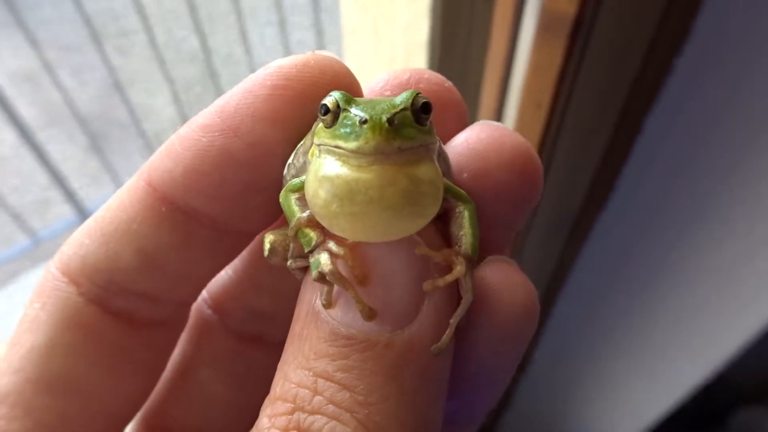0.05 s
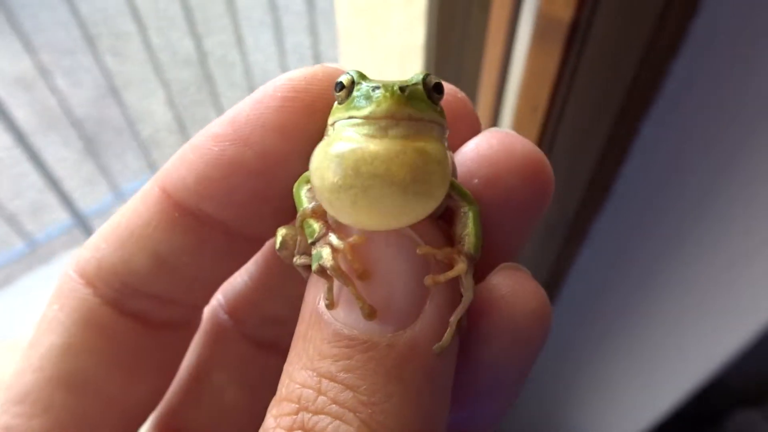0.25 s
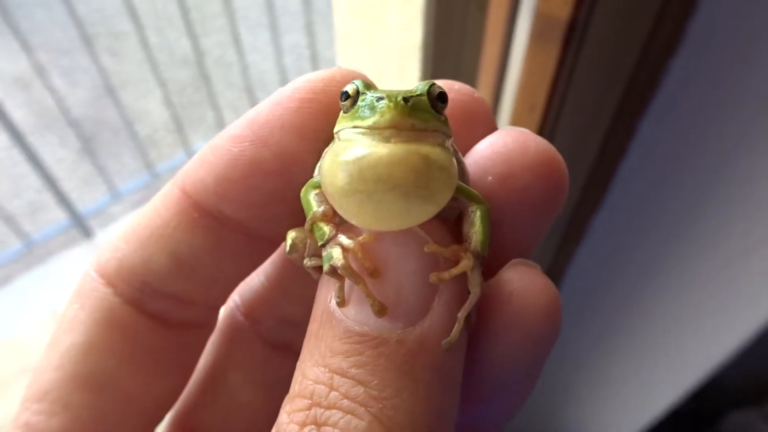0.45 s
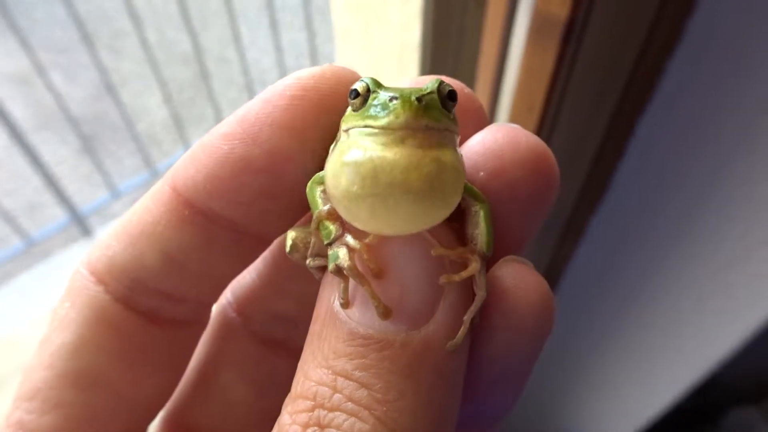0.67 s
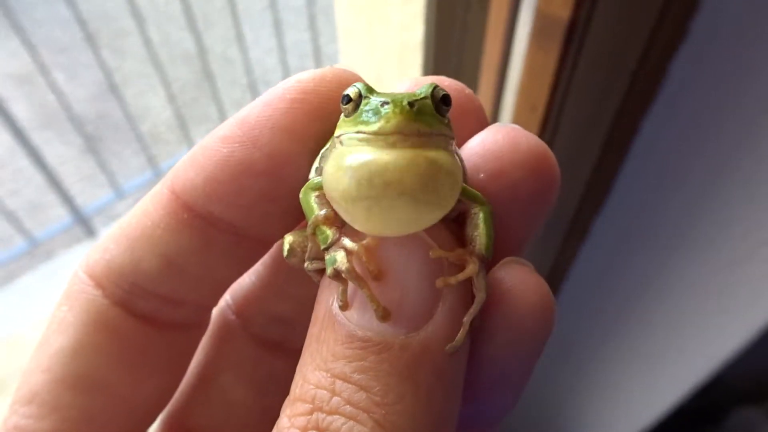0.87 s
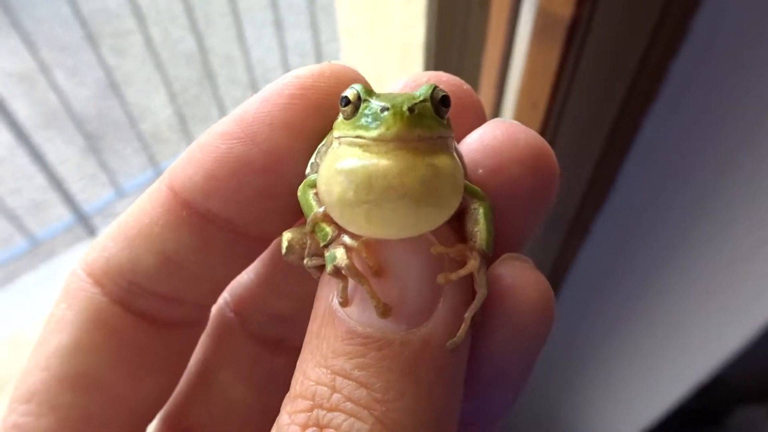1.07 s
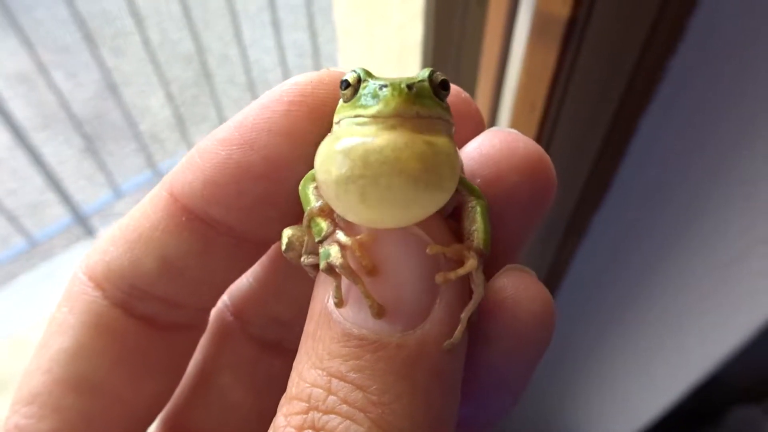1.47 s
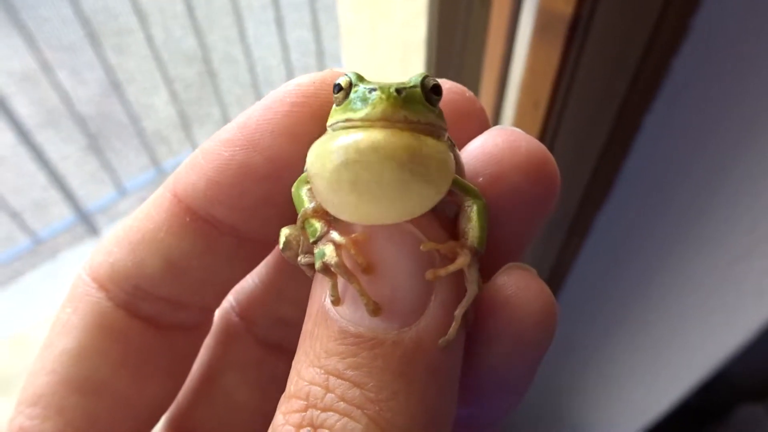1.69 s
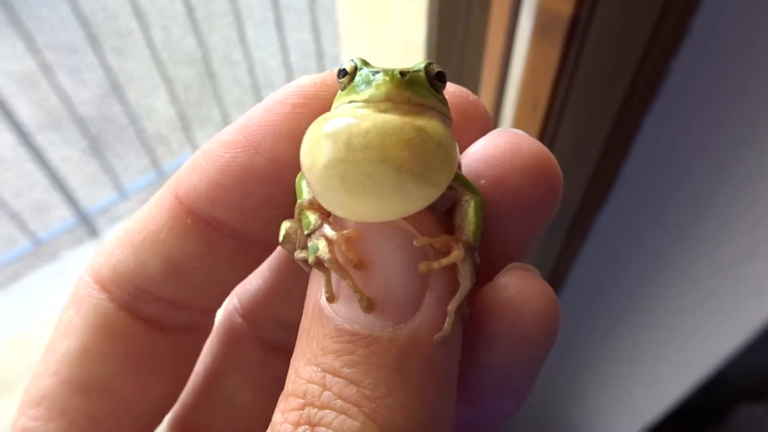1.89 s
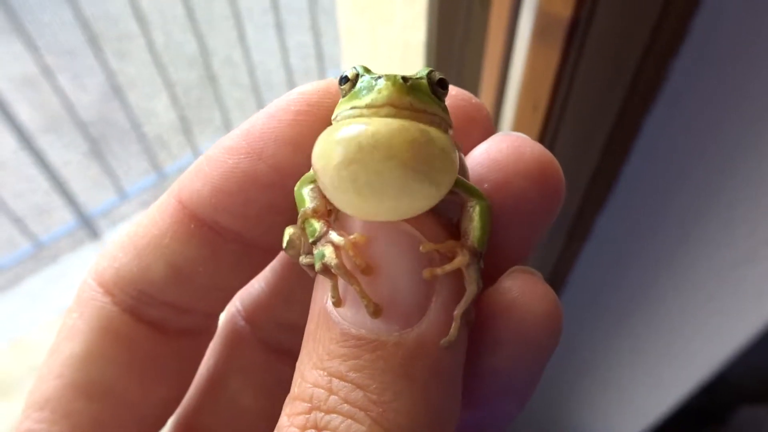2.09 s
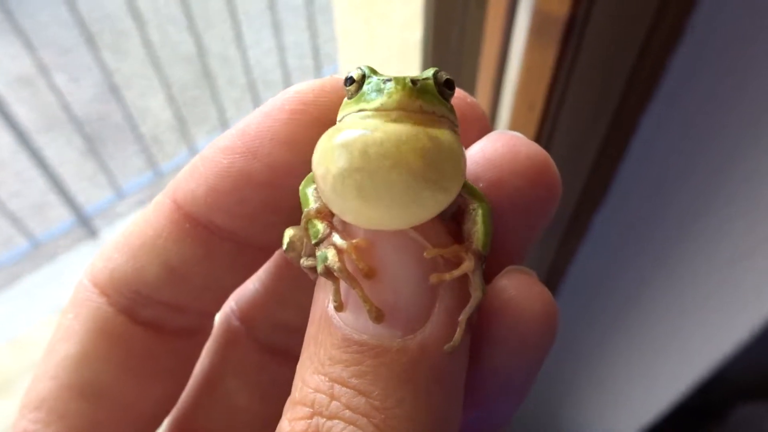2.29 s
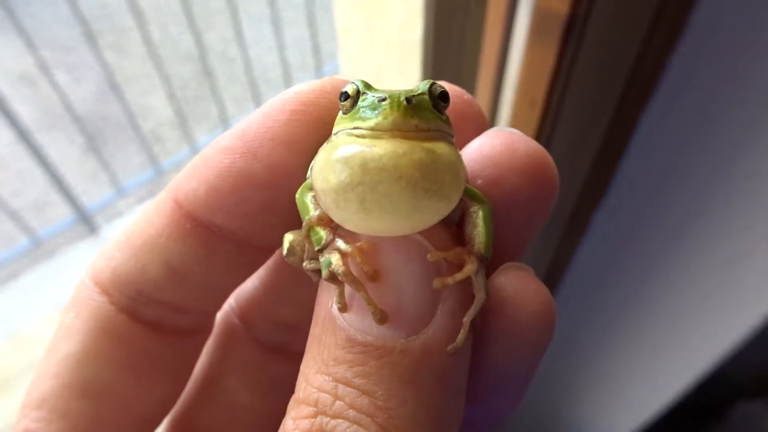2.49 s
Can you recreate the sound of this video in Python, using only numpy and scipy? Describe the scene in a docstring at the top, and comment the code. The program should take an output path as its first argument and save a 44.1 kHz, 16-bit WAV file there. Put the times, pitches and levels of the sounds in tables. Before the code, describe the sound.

A small frog croaks five times, each croak a short, dry rasp of rapid clicks ending in a tiny buzz. Soft ticks lead into them. The microphone is close, in an echoing room with a faint hum.

```python
"""Tree frog in a hard-walled room

A small frog, close by, gives five short rasping croaks. Each is a string of uneven runs of double
clicks from the larynx that ring the throat and vocal sac, brighter as the effort grows, and ends in
a brief buzz, one of them faint. Soft ticks lead in; the room rings on over a quiet hum."""
import sys
import numpy as np
from scipy import signal
from scipy.fft import rfft, irfft
from scipy.io import wavfile
from scipy.ndimage import uniform_filter1d, minimum_filter1d

SR = 44100
rng = np.random.default_rng(int(sys.argv[2]) if len(sys.argv) > 2 else 0)


def master(y):
    """Save y as 16-bit WAV."""
    cut = np.clip(np.atleast_2d(y).T, -1, 1)
    pcm = np.round(cut * 32767)  # scale
    wavfile.write(sys.argv[1], SR, pcm.astype(np.int16))


N = 116865
FROG_GAIN_DB, CLICK_SCATTER_DB = 13, .8
LOW_CUT_HZ, SLACK_TOP_HZ, TAUT_TOP_HZ = 1000, 4340, 7540


def undb(db):
    """Decibels to gain."""
    return 10 ** (np.asarray(db) / 20)


def along(points, hz):
    """Interpolate a spectrum table over log frequency."""
    knots_hz, values = np.array(points).T
    return np.interp(np.log(hz), np.log(knots_hz), values)


def bins(size):
    """FFT bin frequencies, floored at 1 Hz."""
    return np.maximum(np.arange(size // 2 + 1) * SR / size, 1)


def resonance(hz, centre_hz, width_hz):
    """Response of one damped resonance."""
    return 1 / (1 + 1j * (hz ** 2 - centre_hz ** 2) / (hz * width_hz))


def ring(hz, modes):
    """Resonances summed with alternating signs."""
    return sum((-1) ** k * undb(db) * resonance(hz, centre_hz, width_hz)
               for k, (centre_hz, width_hz, db) in enumerate(modes))


def rolloff(ratio, kind, order):
    """Maximally flat filter response; ratio is frequency over corner."""
    return signal.freqs(*signal.butter(order, 1, kind, analog=True), ratio)[1]


def minimum_phase(db):
    """Quickest causal response with these levels."""
    cepstrum = irfft(np.log(undb(db)))
    half = len(cepstrum) // 2
    cepstrum[1:half] *= 2
    cepstrum[half + 1:] = 0
    return np.exp(rfft(cepstrum))


def diffuse(colour, side_db):
    """Stereo noise of given colour and width."""
    hz = bins(2 * N)
    mid, side = rfft(rng.standard_normal((2, 2 * N)))
    side = side * undb(along(side_db, hz))
    return irfft(np.array([mid + side, mid - side]) * undb(along(colour, hz)))[:, :N]


def add_pulse(out, start_s, db, response):
    """Mix in one impulse response at db + FROG_GAIN_DB, with sub-sample timing."""
    size = 2 * len(response) - 2
    first, fraction = divmod(start_s * SR, 1)
    delay = np.exp(-2j * np.pi * bins(size) * fraction / SR)
    out[int(first):int(first) + size] += undb(FROG_GAIN_DB + db) * irfft(response * delay)


# room noise spectrum (frequency [Hz], relative level [dB])
NOISE_COLOUR = [(25, -10.5), (60, -17), (120, -14.5), (210, -13.5), (300, -12.5), (400, -12), (520, -15.5),
                (750, -17), (1100, -15), (1700, -19.5), (2800, -19), (4300, -25.5), (7500, -27),
                (16000, -37.5)]
# room noise width (frequency [Hz], side minus mid [dB])
NOISE_WIDTH = [(30, -22), (120, -9.5), (300, -6.5), (1000, 1), (8000, -2)]
# room noise envelope (time [s], level [dB])
NOISE_ENVELOPE = [(0, -65), (0.249, -61.5), (0.449, -67.5), (1.302, -69), (2.65, -69)]
def background(hum_hz=396.3, hum_relative_db=-12.5):
    """Quiet room noise with a wavering narrow-band hum."""
    air = diffuse(NOISE_COLOUR, NOISE_WIDTH)
    hum_band = resonance(bins(2 * N), hum_hz, width_hz=12) ** 2
    hum = irfft(rfft(rng.standard_normal(2 * N)) * hum_band)[:N]
    level_db = np.interp(np.arange(N) / SR, *np.array(NOISE_ENVELOPE).T)
    return undb(level_db) * (air / air.std() + undb(hum_relative_db) * hum / hum.std())


# lead-in ticks (time [s], relative level [dB])
THROAT_TICKS = [(.149, -13.5), (0.64, -12.5), (1.3633, -16), (1.8128, -12.5), (1.819, -13.5),
                (2.2697, -16.5), (2.2857, -10)]
# tick resonances (centre [Hz], width [Hz], gain [dB])
TICK_RESONANCES = [(1150, 83, -7.5), (1656, 130, -0.5), (2593, 210, 3.5), (3674, 170, -1.5)]
def ticks(top_hz=3930):
    """Soft, dull ticks as the throat starts to move before each croak."""
    out, hz = np.zeros(N), bins(2048)
    band = rolloff(hz / LOW_CUT_HZ, "high", order=3) * rolloff(hz / top_hz, "low", order=14)
    tick = ring(hz, TICK_RESONANCES) * band
    for start_s, db in THROAT_TICKS:
        add_pulse(out, start_s, db, tick)
    return out


# throat and sac resonances (centre [Hz], width [Hz], slack gain [dB], taut gain [dB])
SAC_RESONANCES = [(1244, 296, -5.5, -12), (1839, 328, 2.5, -3.5), (2406, 272, 4.5, 0.5),
                  (2918, 228, -13.5, 6), (3510, 147, -12, 5), (3808, 267.4, -0.5, -1.5),
                  (4443, 1100, -11, -11), (6445, 470, -31.5, -16), (734, 158, -22.5, -17.5)]
# dry snap of the folds (frequency [Hz], gain [dB])
SNAP_COLOUR = [(60, -58), (200, -39.5), (500, -31), (3000, -78.5), (6500, -30.5), (8500, -43),
               (11000, -39.5), (13500, -59.5), (16000, -50.5)]
def fold_flap(hz, effort, tuning, snap_effort_db=-15.5):
    """One flap rings throat and sac; effort (0-1) reweights modes, opens the treble, softens the snap."""
    modes = []
    for centre_hz, width_hz, slack_db, taut_db in SAC_RESONANCES:
        gain = undb(slack_db) * (1 - effort) ** 2 + undb(taut_db) * effort
        modes.append((centre_hz * tuning, width_hz, 20 * np.log10(gain)))
    top_hz = SLACK_TOP_HZ + (TAUT_TOP_HZ - SLACK_TOP_HZ) * effort ** 2.35
    band = rolloff(hz / LOW_CUT_HZ, "high", order=4) * rolloff(hz / top_hz, "low", order=12)
    snap = minimum_phase(along(SNAP_COLOUR, hz) + snap_effort_db * effort)
    return ring(hz, modes) * band + snap


# sac tightening per croak
# (valid from [s], onset [s], time constant [s], relative taut level [dB], taut minus slack [dB])
CROAK_EFFORT = [(.2, 0.27, 0.056, 1, 3), (.65, 0.691, .045, 0, -3), (1.4, 1.479, 0.054, 0.5, 4.5),
                (1.83, 1.865, 0.036, -0.5, -4.5), (2.28, 2.307, 0.036, -0.5, -3.5)]
# runs of larynx clicks (start [s], length [s], clicks [count])
CLICK_RUNS = [ (.2408, .003, 2), (.2625, .0087, 2), (.2842, .0104, 3), (.2996, .0139, 4), (.3205, 0, 1),
              (.3283, .0102, 3), (.3503, .0122, 3), (.3742, .0123, 3), (.3958, .0137, 4), (.695, 0, 1),
              (.7054, .0114, 3), (.7243, .0182, 4), (.787, .012, 3), (.8047, .0133, 5), (.823, .0115, 3),
              (1.462, .0185, 2), (1.4936, .018, 2), (1.5203, 0, 1), (1.533, .0113, 3), (1.5555, .0148, 4),
              (1.5803, .0215, 5), (1.615, .0045, 2), (1.881, .015, 4), (1.9048, .0194, 4), (1.934, .011, 3),
              (1.9608, .0062, 2), (1.9868, .0074, 3), (2.0025, .0212, 5), (2.0327, 0, 1), (2.3253, .006, 2),
              (2.3412, .0095, 3), (2.3565, .009, 3), (2.3753, .0037, 2)]
def rasps(flap_gap_s=.00102, gap_scatter=.04, second_flap_db=.5, jitter_s=.0003, pitch_scatter=.014):
    """Uneven runs of clicks, two fold flaps each; effort climbs through a croak and levels off."""
    out, hz = np.zeros(N), bins(2048)
    for start_s, length_s, count in CLICK_RUNS:
        croak = [row for row in CROAK_EFFORT if row[0] <= start_s][-1]
        _, onset_s, tighten_s, taut_db, swell_db = croak
        for k, at_s in enumerate(np.linspace(start_s, start_s + length_s, count)):
            slip, loud, tune, gap = rng.standard_normal(4)
            if 0 < k < count - 1:
                at_s += jitter_s * slip
            effort = 1 - np.exp(-max(at_s - onset_s, 0) / tighten_s)
            click_db = taut_db + swell_db * (effort - 1) + CLICK_SCATTER_DB * loud
            flap = fold_flap(hz, effort, tuning=1 + pitch_scatter * tune)
            add_pulse(out, at_s - flap_gap_s / 2, click_db, flap)
            add_pulse(out, at_s + flap_gap_s * (.5 + gap_scatter * gap), click_db + second_flap_db, flap)
    return out


# closing buzzes (start [s], length [s], relative flap level [dB])
CLOSING_BUZZES = [(.415, .008, 0.5), (0.8381, .011, 0), (1.623, .005, -15.5), (2.0386, .006, -1),
                  (2.3825, 0.0041, -3.5)]
# low ring of the full sac (centre [Hz], width [Hz], gain [dB])
FULL_SAC_RESONANCES = [(667, 340, -29), (1042, 40, 0.5)]
def buzzes(flap_rate_hz=1027.8, jitter_periods=.047):
    """At the end of a croak the folds flap freely and the full sac rings low."""
    out, hz = np.zeros(N), bins(2048)
    flap = fold_flap(hz, effort=.959, tuning=.94)
    lowest_hz = FULL_SAC_RESONANCES[0][0]
    band = rolloff(hz / lowest_hz, "high", order=6) * rolloff(hz / SLACK_TOP_HZ, "low", order=4)
    full_sac = ring(hz, FULL_SAC_RESONANCES) * band
    for start_s, length_s, db in CLOSING_BUZZES:
        times_s = np.arange(start_s, start_s + length_s, 1 / flap_rate_hz)
        for at_s, (slip, loud) in zip(times_s, rng.standard_normal((32, 2))):
            add_pulse(out, at_s + jitter_periods * slip / flap_rate_hz, db + CLICK_SCATTER_DB * loud, flap)
        add_pulse(out, start_s + length_s / 2, 0, full_sac)
    return out


# nearby surfaces (delay [s], gain [dB])
REFLECTIONS = [(.0066, -17), (.0092, -18)]
# microphone port balance (frequency [Hz], left minus right [dB])
PORT_BALANCE = [(700, 1), (1300, -5), (2400, 0.5), (3100, -3.5), (4200, -1.5), (6300, 2.5), (10000, -8)]
# phase between ports (frequency [Hz], right lag [rad])
PORT_LAG = [(1000, -0.5), (3000, 0.52), (4700, 0.5), (5200, 4.5), (5700, 6.5), (7500, 8), (10000, 11.5)]
def near_field(voice):
    """Direct sound and two close reflections at the two microphone ports."""
    hz = bins(2 * N)
    paths = 1 + sum(undb(db) * np.exp(-2j * np.pi * hz * delay_s) for delay_s, db in REFLECTIONS)
    left = undb(along(PORT_BALANCE, hz) / 2)
    right = np.exp(-1j * along(PORT_LAG, hz)) / left
    return irfft(rfft(voice, 2 * N) * paths * np.array([left, right]))[:, :N]


# reverb spectrum (frequency [Hz], relative level [dB])
REVERB_COLOUR = [(300, 3), (700, -2.5), (1100, -2), (1550, 7.5), (2000, -5.5), (2900, -6), (3250, -1),
                 (4000, -7.5), (6300, -5), (11000, 0)]
# reverb width (frequency [Hz], side minus mid [dB])
REVERB_WIDTH = [(200, -29), (700, -24.5), (1300, -5), (2400, -8), (4400, 0.5), (8000, 1)]
def room(voice, delay_s=.0076, build_s=.0055, t60_s=.53, gain_db=-5):
    """Hard walls return a diffuse ring that builds quickly and dies in half a second."""
    age_s = np.maximum(np.arange(N) / SR - delay_s, 0)
    envelope = (1 - np.exp(-age_s / build_s)) * np.exp(-np.log(1000) * age_s / t60_s)
    tail = diffuse(REVERB_COLOUR, REVERB_WIDTH) * envelope / np.linalg.norm(envelope)
    return undb(gain_db) * signal.fftconvolve(tail, voice[None], axes=1)[:, :N]


def scene(tick_send_db=-9.5):
    """Close frog, room and background; the ticks reach the room less than the voice does."""
    lead_in = ticks()
    voice = rasps() + buzzes()
    return near_field(voice + lead_in) + room(voice + undb(tick_send_db) * lead_in) + background()


def record(dry, ceiling_db=-4.5, lookahead_s=.002, top_hz=16200):
    """Look-ahead peak limiter, then a steep low-pass."""
    peak = np.abs(dry).max(axis=0)
    wanted_gain = np.minimum(1, undb(ceiling_db) / (peak + 1e-9))
    ahead = int(lookahead_s * SR)
    gain = uniform_filter1d(minimum_filter1d(wanted_gain, 2 * ahead), ahead)
    lowpass = signal.ellip(8, .2, 70, top_hz, fs=SR, output="sos")
    return signal.sosfilt(lowpass, dry * gain)


dry = scene()
out = record(dry)
master(out)
```